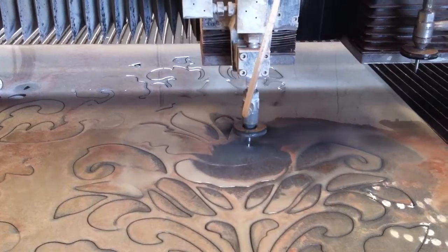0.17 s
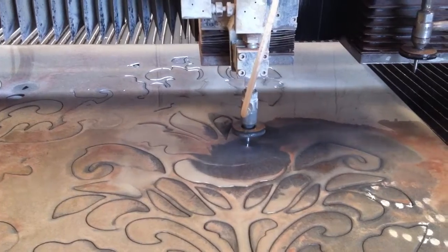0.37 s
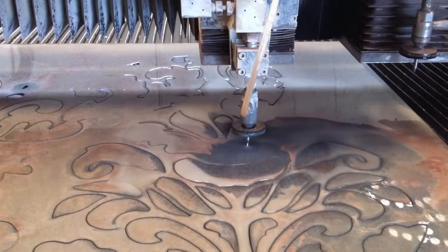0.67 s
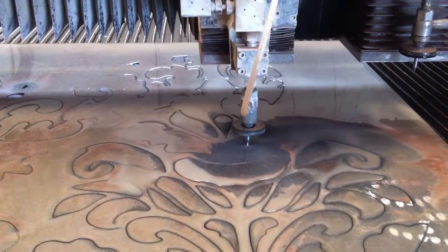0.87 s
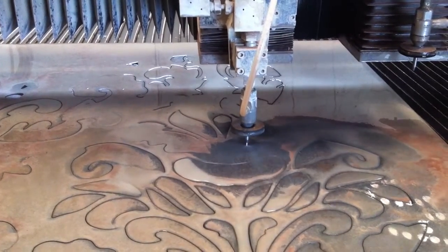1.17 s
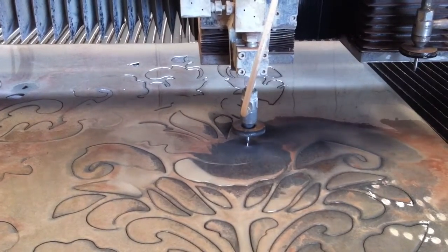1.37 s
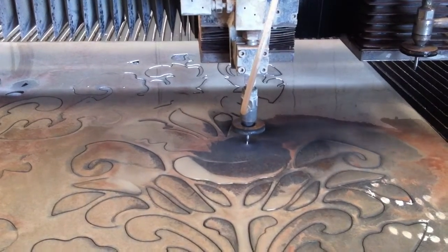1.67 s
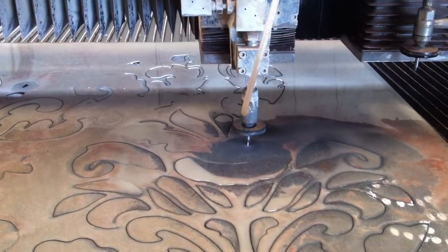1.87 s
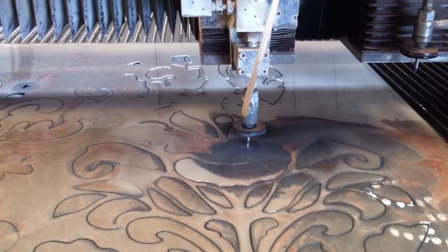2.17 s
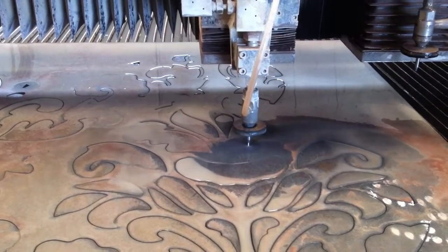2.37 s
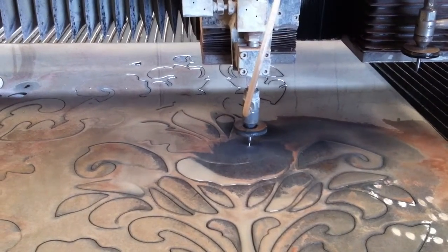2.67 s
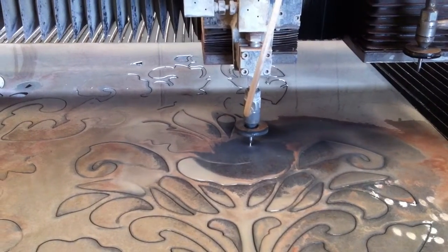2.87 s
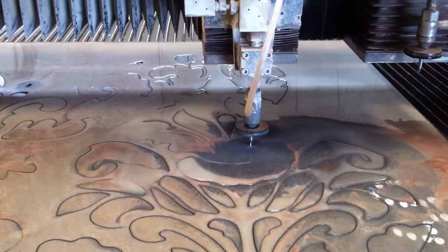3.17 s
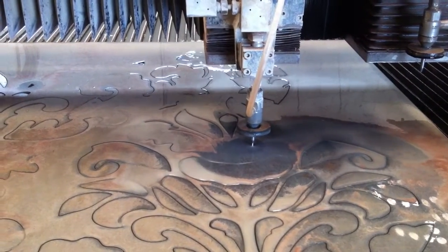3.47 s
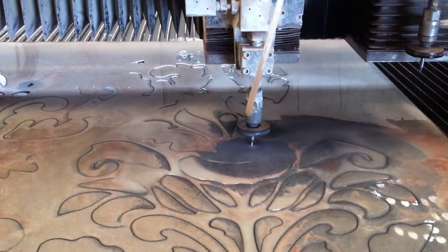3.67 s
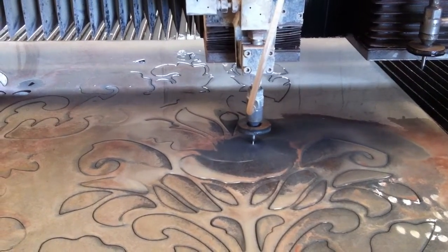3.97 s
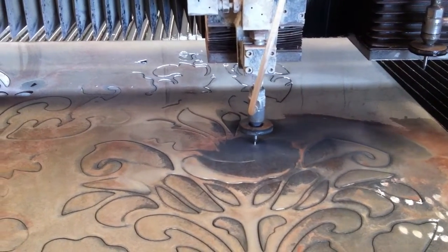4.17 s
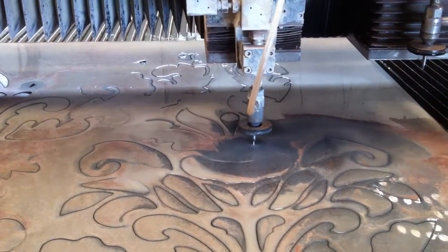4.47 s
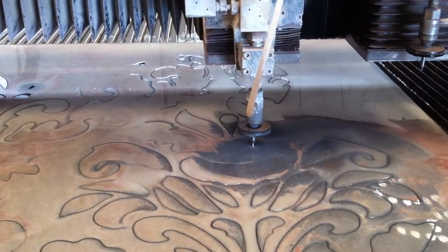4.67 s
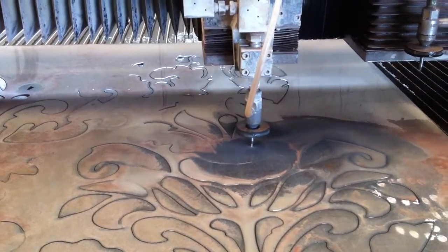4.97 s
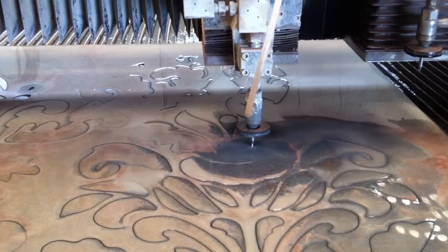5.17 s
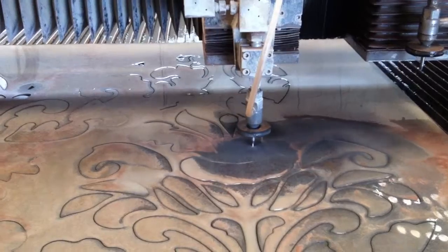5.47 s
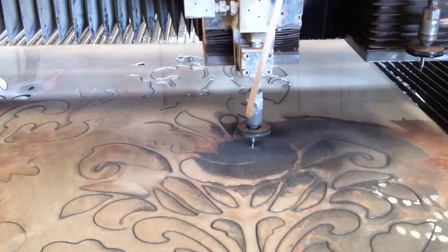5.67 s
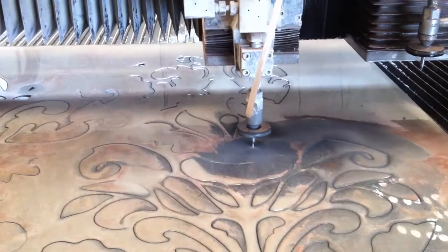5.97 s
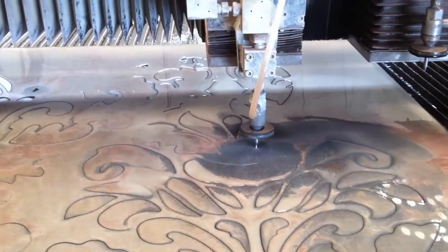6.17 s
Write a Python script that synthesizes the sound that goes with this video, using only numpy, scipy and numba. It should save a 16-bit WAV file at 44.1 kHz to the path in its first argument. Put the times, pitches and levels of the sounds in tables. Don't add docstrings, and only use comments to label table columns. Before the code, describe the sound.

Continuous harsh, bright hissing from a water jet slicing metal over a water tank, close and mono. It starts fairly even, with a faint low gurgle, then turns wetter and shriller as water fills the slot. Brief muffled chokes alternate with roaring bursts and whistling air gusts, while irregular low bubble thumps knock underneath until the abrupt end.

```python
import sys
import numpy as np
from scipy import signal
from scipy.fft import rfft, irfft
from scipy.io import wavfile
from scipy.ndimage import uniform_filter1d, map_coordinates
from numba import njit

SR = 44100
rng = np.random.default_rng(int(sys.argv[2]) if len(sys.argv) > 2 else 0)


def gain_from_db(level_db):
    decades = np.asarray(level_db, float) / 20
    return 10 ** decades


def transcribe(u):
    v = np.clip(np.atleast_2d(u).T, -1, 1)
    q = np.round(v * 32767).astype(np.int16)
    wavfile.write(sys.argv[1], SR, q)


N = 278712


@njit
def svf_loop(x, g, k):
    y, band, low = np.empty(len(x)), 0., 0.
    for i in range(len(x)):
        v = (band + g[i] * (x[i] - low)) / (1 + g[i] * (g[i] + k))
        band = 2 * v - band
        low = low + 2 * g[i] * v
        y[i] = k * v
    return y


def svf(x, hz, width):
    tuning = np.tan(np.pi * np.clip(hz, 10, .45 * SR) / SR) + np.zeros(N)
    return svf_loop(x, tuning, width / np.mean(hz))


def unit(x):
    return x / np.sqrt(np.mean(x ** 2))


def resonance(hz, width):
    once = svf(rng.standard_normal(N), hz, width)
    return unit(svf(once, hz, width))


def steady(x, span_s=0.42):
    return x / np.sqrt(uniform_filter1d(x ** 2, int(span_s * SR)) + 1e-18)


def walk(rate):
    knots = rng.standard_normal(400)
    place = np.clip(np.arange(N) * rate / SR, 0, len(knots) - 1)
    return map_coordinates(knots, [place], order=2)


def bell(t, s, length):
    return np.exp(-(2 * (t - s) / length) ** 2)


def swells(events, t):
    return sum(db * bell(t, s, length) for s, db, length in events)


def strips(edges_hz, shape_db, own_db, rate):
    hz = np.fft.rfftfreq(N, 1 / SR) + 1e-9
    white = rfft(rng.standard_normal(N))
    out, last = 0, walk(rate)
    for k in range(len(edges_hz)):
        share = np.interp(hz, edges_hz, np.arange(len(edges_hz)) == k)
        new = walk(rate)
        flicker = gain_from_db(own_db * (new + last) / np.sqrt(2))
        out = out + flicker * irfft(white * share * gain_from_db(shape_db(hz)), N)
        last = new
    return unit(out)


def ringing(modes, wet, drift, own_db, rate):
    out = 0
    for hz, width, dry_db, wet_db in modes:
        centre = hz * (1 + drift * walk(9.))
        level_db = dry_db + wet * (wet_db - dry_db) + own_db * walk(rate)
        out = out + gain_from_db(level_db) * resonance(centre, 1.19 * width)
    return unit(out)


def bed(low_hz, top_hz, tilt_db, count):
    edges = np.linspace(low_hz, top_hz, count + 2)

    def inside(hz):
        return np.interp(hz, edges[[0, 1, -2, -1]], [-60, 0, tilt_db, -60])

    return strips(edges, inside, own_db=2.5, rate=32.)


def kerf(wet):
    # (pitch [Hz], width [Hz], level dry [dB], level flooded [dB])
    slot_modes = [(2720, 320, 2, -12), (2631, 303, -8, 0), (3314, 400, 0.5, 1), (4154, 460, -2, 4.5),
                  (4670, 580, -0.5, -0.5), (5260, 340, -21, -5.5), (6000, 320, 0, -7),
                  (6680, 340, -14, -7.5)]
    rings = ringing(slot_modes, wet, drift=0.021, own_db=2.5, rate=45.)
    return steady(rings + gain_from_db(-2) * bed(1765, 8130, -0.56, count=9))


def spray(wet):
    # (pitch [Hz], width [Hz], level dry [dB], level flooded [dB])
    mist_modes = [(10660, 670, 5.5, -2), (11320, 500, 2.5, -4.5), (12600, 820, -20, -2.5),
                  (14200, 2400, 3, -6), (15700, 4000, -5, 0.5)]
    rings = ringing(mist_modes, wet, drift=0.0042, own_db=0.5, rate=16.0)
    return steady(gain_from_db(-2.5) * rings + bed(9450, 17300, -3.5, count=11))


def tank():
    # (frequency [Hz], level per Hz [dB])
    churn = [(15, -65), (25, -41), (54, -39), (135, -8), (224, -2), (340, -2.5), (469, -6.5), (526, -4),
             (660, -7), (945, -3), (1190, -5.5), (1410, -2), (1830, -6), (2300, -2), (2990, -47),
             (5060, -120)]
    points, levels = np.transpose(churn)

    def shape_db(hz):
        return np.interp(np.log(hz), np.log(points), levels)

    half_octaves = 25 * 2 ** np.arange(0, 7, .5)
    return strips(half_octaves, shape_db, own_db=1.8, rate=18.)


def whistle(wet):
    full_hz, dry_drop_hz = 9053, 190
    hz = (full_hz - dry_drop_hz * (1 - wet)) * (1 + 0.0059 * walk(7.8))
    narrow = resonance(hz * (1 + 0.009 * walk(25.)), 690.0)
    level_db = -16 + 14.8 * wet + 3.5 * walk(45.)
    breath = bed(7170, 10470, .5, count=5)
    return steady(gain_from_db(level_db) * narrow + gain_from_db(-1.0) * breath)


def plate_echo(x, wet):
    # (centre [Hz], width [Hz], depth dry [0-1], depth flooded [0-1])
    cancelled = [(1830, 160, 0, 0.1), (4045, 470, 0.9, 0.37), (7040, 500, .6, 0.48),
                 (7700, 660, 0.85, 0.26), (7330, 600, .1, 0.38), (9500, 400, 0.9, 0.16),
                 (10260, 250, 0.7, 0.2), (11630, 230, 0.7, 0.14), (12700, 550, .85, 0),
                 (13800, 910, .5, .3)]
    for centre, width, dry_depth, flooded_depth in cancelled:
        depth = dry_depth + wet * (flooded_depth - dry_depth + 0.083 * walk(7.))
        moving_hz = centre * (1 + 0.0071 * walk(5.))
        x = x - np.clip(depth, 0, 1) * svf(x, moving_hz, width)
    return x


def gusts(t):
    # (time [s], rise [dB], length [s])
    air = [(0.115, 10, 0.076), (0.708, 17, 0.024), (0.913, 4, 0.1), (0.998, 7, 0.041), (1.327, 8, 0.037),
           (1.417, 7.5, 0.32), (1.696, 12.5, 0.054), (1.886, 12, 0.045), (1.976, 7, 0.074),
           (2.08, 10, 0.055), (2.205, 8, 0.11), (2.464, 7, 0.12), (2.584, 3, 0.045), (2.664, 5, 0.038),
           (2.893, 9.5, 0.37), (3.213, 7, 0.1), (3.597, 5, 0.05), (5.034, 3.5, 0.031), (5.168, 6, 0.041),
           (5.727, 4.5, 0.14), (6.106, 7, 0.039), (6.291, 12, 0.024)]
    return swells(air, t)


def gurgles(t):
    # (time [s], level [dB], length [s], pitch [Hz])
    trapped = [
        (0.13, -30, 0.18, 324),
        (1.187, -32, 0.064, 330),
        (2.78, -34, 0.16, 950),
        (4.173, -28, 0.19, 935),
        (5.796, -29, 0.062, 410),
    ]
    return sum(gain_from_db(db) * bell(t, s, length) * resonance_once(hz) for s, db, length, hz in trapped)


def resonance_once(hz):
    return unit(svf(rng.standard_normal(N), hz, hz * 0.22))


def chokes(t):
    # (time [s], depth [dB], length [s])
    closing = [(0.599, 2, 0.043), (0.743, 2, 0.037), (0.793, 8.5, 0.046), (0.963, 10.5, 0.04),
               (1.033, 13.5, 0.031), (1.132, 6, 0.025), (1.267, 2.5, 0.05), (1.367, 8, 0.045),
               (1.566, 5.5, 0.14), (1.931, 6, 0.05), (2.12, 6, 0.064), (2.35, 4, 0.035),
               (2.534, 2.5, 0.041), (2.893, 8, 0.02), (3.048, 11, 0.078), (3.821, 4.5, 0.045),
               (4.041, 6, 0.1), (4.3, 0.5, 0.05), (4.44, 7, 0.12), (4.704, 10, 0.061), (4.869, 1.6, 0.045),
               (4.949, 10, 0.059), (5.283, 9.5, 0.074), (5.537, 4, 0.039), (5.877, 7, 0.033),
               (5.951, 9.5, 0.071)]
    return swells(closing, t)


def surges(t):
    # (time [s], rise [dB], length [s])
    breaks = [(0.858, 4, 0.09), (1.063, 3.5, 0.036), (1.167, 2.5, 0.062), (2.22, 4, 0.05), (2.32, 4, 0.05),
              (2.913, 4.5, 0.077), (3.128, 3.5, 0.089), (3.517, 3.5, 0.13), (3.786, 6, 0.095),
              (4.146, 4, 0.21), (4.53, 7.5, 0.089), (4.644, 7, 0.024), (4.849, 4.4, 0.12),
              (5.054, 4, 0.068), (5.318, 4, 0.041), (5.468, 6.5, 0.05), (5.572, 4.5, 0.036),
              (5.767, 4, 0.057), (5.902, 3.0, 0.05), (5.971, 8, 0.018), (6.041, 4.5, 0.22),
              (6.256, 6, 0.04)]
    return swells(breaks, t)


def thumps():
    # (time [s], peak level [dB], pitch [Hz])
    pockets = [(1.168, -17, 355), (1.316, -30, 307), (1.487, -17, 320), (1.678, -11.5, 247),
               (1.88, -21, 240), (2.009, -17.5, 246), (2.383, -22, 210), (2.432, -23, 234),
               (2.485, -16, 213), (2.571, -15, 293), (2.982, -16, 164), (3.459, -12, 188),
               (3.587, -16, 549), (4.53, -14, 549), (4.633, -14.5, 202), (4.751, -24, 266),
               (4.784, -13, 334), (4.83, -21, 293), (5.301, -20, 361), (5.371, -13, 205), (5.757, -15, 291),
               (5.836, -12, 240)]
    out, t = np.zeros(N + SR), np.arange(SR // 20) / SR
    for s, db, hz in pockets:
        swell = t * hz / 0.87 * np.exp(1 - t * hz / 0.63)
        splash = uniform_filter1d(rng.standard_normal(len(t)), SR // 2000)
        start = int(s * SR)
        out[start:start + len(t)] += gain_from_db(db - 6.0) * swell * (np.sin(2 * np.pi * hz * t) + 4.3 * splash)
    low_cut = signal.butter(3, 130, "high", fs=SR, output="sos")
    return signal.sosfilt(low_cut, out[:N])


def scene():
    # (time [s], share of the cut under water [0-1])
    flooding = [
        (0, 0),
        (.66, 0.27),
        (.95, 0.9),
        (2.9, 0.8),
        (3.8, 0.96),
        (4.7, 0.82),
        (5.2, 1),
        (6.32, 0.98),
    ]
    # (level dry [dB], added when flooded [dB], share of a choke, share of a gust, share of a surge)
    layer_moves = [
        (-27.5, -0.74, -0.48, 0.16, 0.3),
        (-18.5, 0.85, -0.38, 0.011, 0.83),
        (-26.5, 8, -0.75, 0.62, .01),
        (-19, -0.14, -0.34, 0.13, 0.23),
    ]
    t = np.arange(N) / SR
    wet = np.clip(np.interp(t, *np.transpose(flooding)), 0, 1)
    moves = np.array([1 + 0 * t, wet, chokes(t), gusts(t), surges(t)])
    levels = gain_from_db(np.array(layer_moves) @ moves)
    x = np.sum(levels * [tank(), kerf(wet), whistle(wet), spray(wet)], axis=0)
    sputter_db = wet * (0.36 * walk(17.) + 1.1 * walk(55.))
    x = x * gain_from_db(sputter_db) + thumps() + gurgles(t)
    x = plate_echo(x, wet)
    return np.array([x, x])


def holes(x):
    # (lowest [Hz], highest [Hz], strip width [Hz], rarity [spreads], pull of a dropout [spreads])
    weak_bands = [(6950, 7850, 150, .9, 1.6), (9400, 9600, 200, 1.8, 0), (10200, 10400, 200, 1.6, 0),
                  (11400, 12600, 200, 1.7, 0), (12600, 13800, 150, .75, 0), (13800, 15400, 200, 1.5, 0)]
    # (time [s], length [s])
    dropouts = [(.18, .08), (.35, .04), (.87, .06), (1.09, .09), (1.19, .07), (1.65, .04), (3.07, .07),
                (3.54, .06), (3.83, .06), (4.17, .11), (4.52, .07), (4.66, .06), (4.77, .1), (4.97, .04),
                (5.14, .11), (5.3, .08), (5.54, .05), (5.92, .09), (6.14, .06)]
    t, hz, spectrum = np.arange(N) / SR, np.fft.rfftfreq(N, 1 / SR), rfft(x)
    drop = sum(bell(t, s, length) for s, length in dropouts)
    for low, top, width, rarity, pull in weak_bands:
        for edge in np.arange(low, top, width):
            gone = np.clip(3 * (walk(25.) + pull * drop - rarity), 0, 1)
            strip = (hz >= edge) & (hz < edge + width)
            x = x - gone * irfft(spectrum * strip, N)
    return x


def low_pass(x):
    return signal.sosfilt(signal.butter(12, 16860, fs=SR, output="sos"), x)


def record(dry):
    limit_db, limit_ratio, limit_s = -14.5, 1.38, 0.064
    low_hz, top_hz = 45, 15735
    loud = np.sqrt(uniform_filter1d(dry ** 2, int(limit_s * SR)) + 1e-9)
    x = dry * np.minimum(gain_from_db(limit_db) / loud, 1) ** (1 - 1 / limit_ratio)
    x = np.tanh(1.214 * x) / 1.18
    x = signal.sosfilt(signal.butter(2, low_hz, "high", fs=SR, output="sos"), x)
    x = holes(x[0]) + 0 * x
    x = signal.sosfilt(signal.ellip(16, .3, 75, top_hz, fs=SR, output="sos"), x)
    return low_pass(x)


dry = scene()
out = record(dry)
transcribe(out)
```